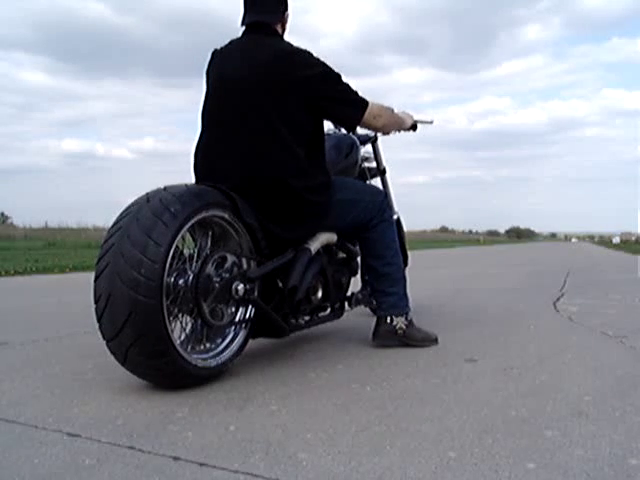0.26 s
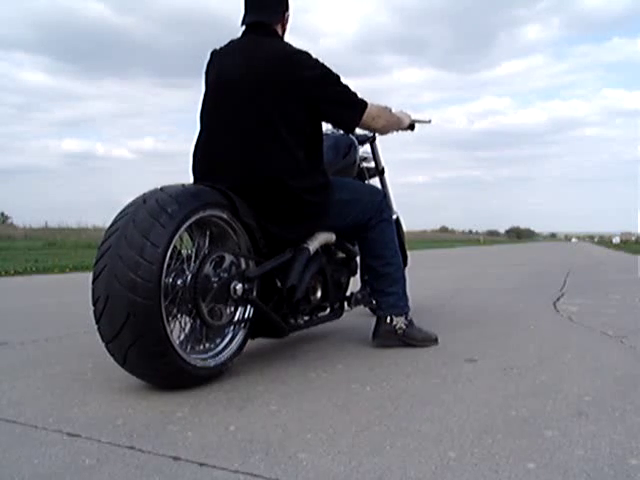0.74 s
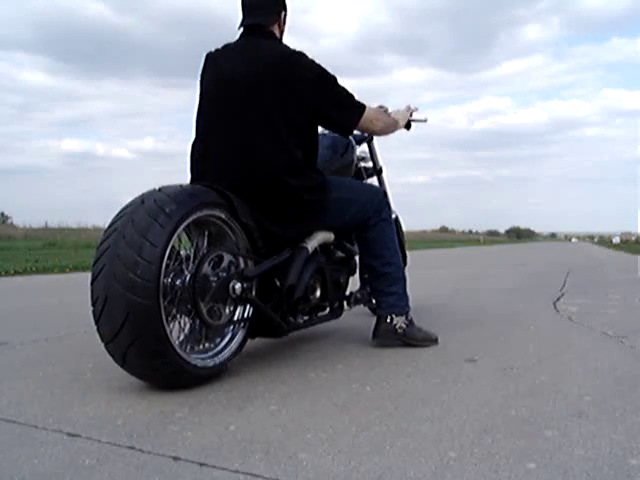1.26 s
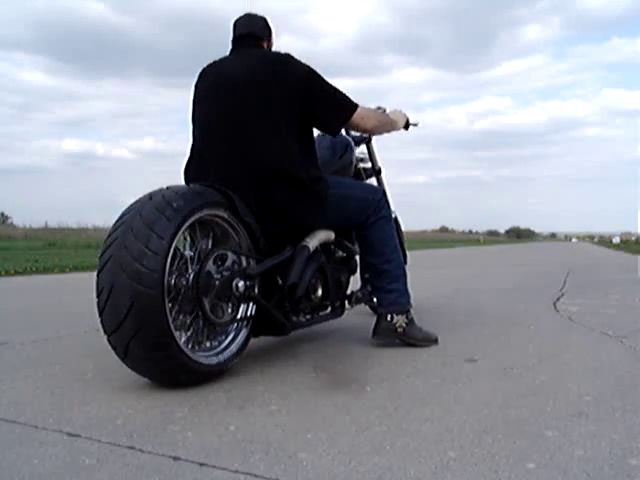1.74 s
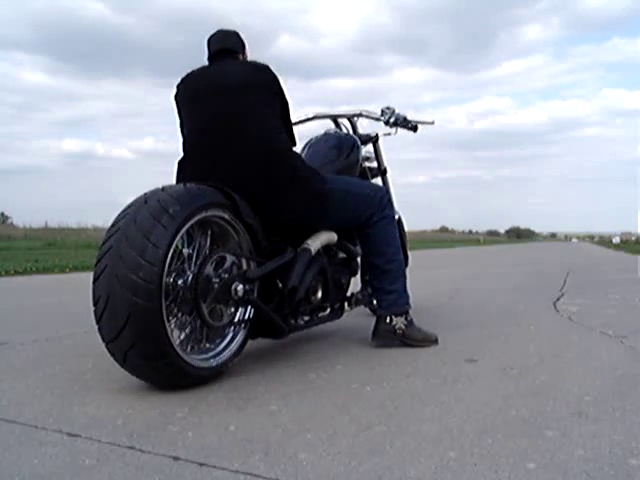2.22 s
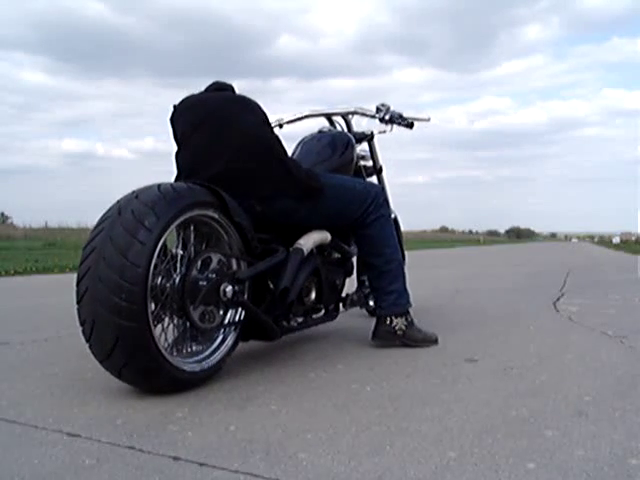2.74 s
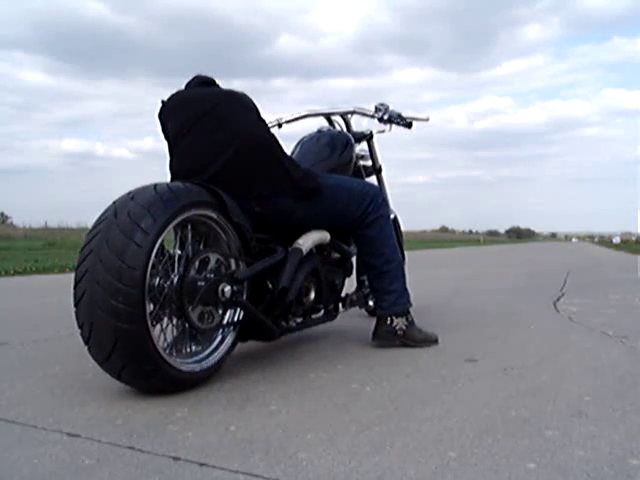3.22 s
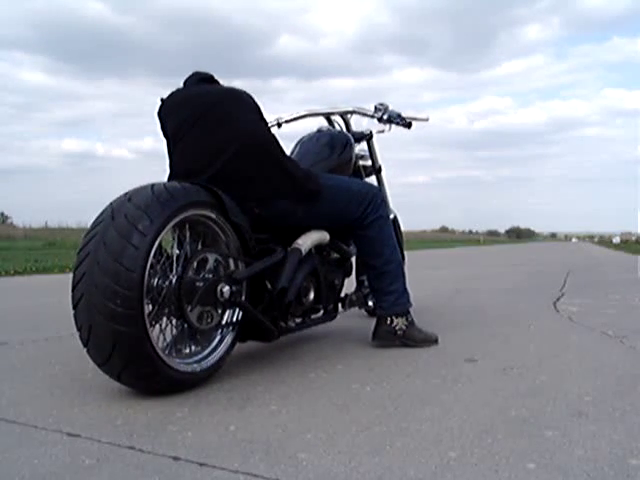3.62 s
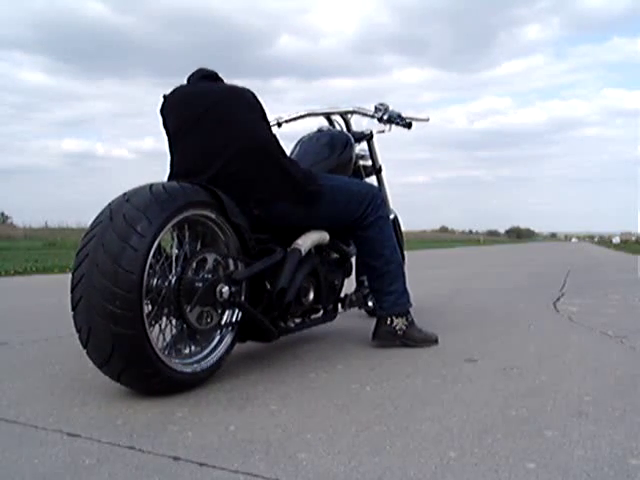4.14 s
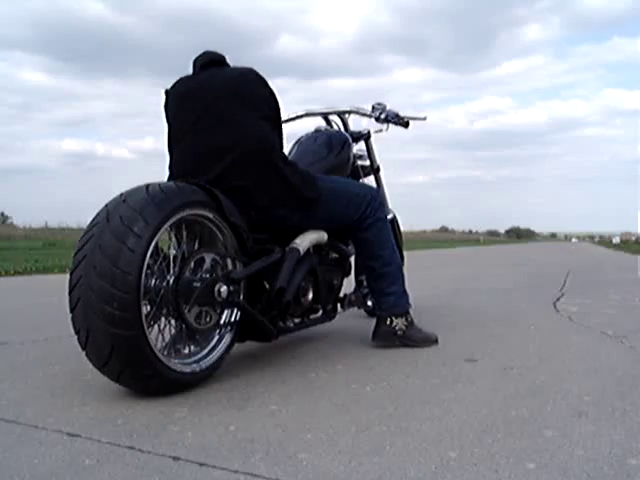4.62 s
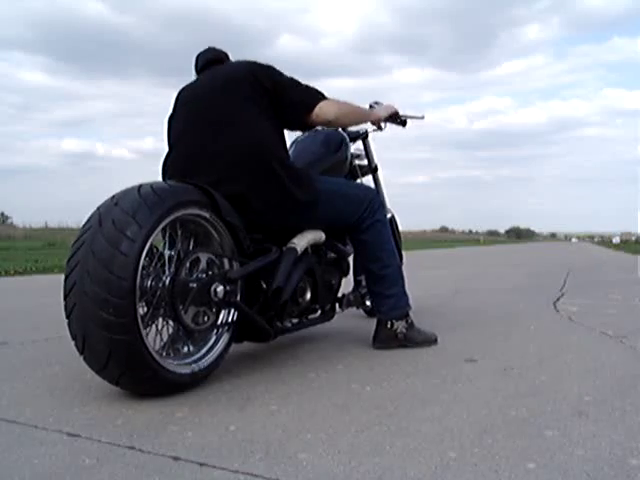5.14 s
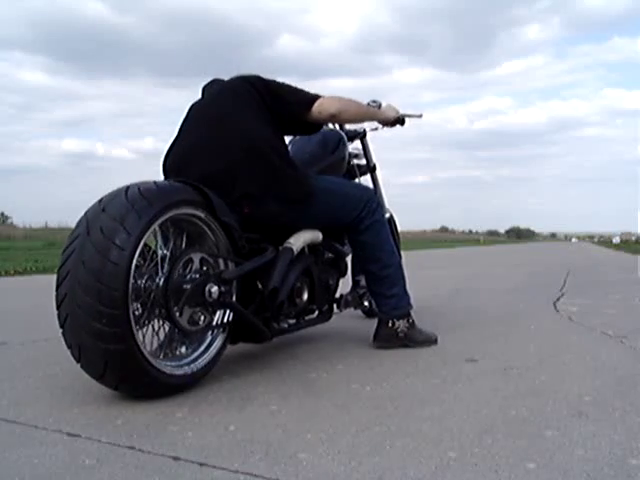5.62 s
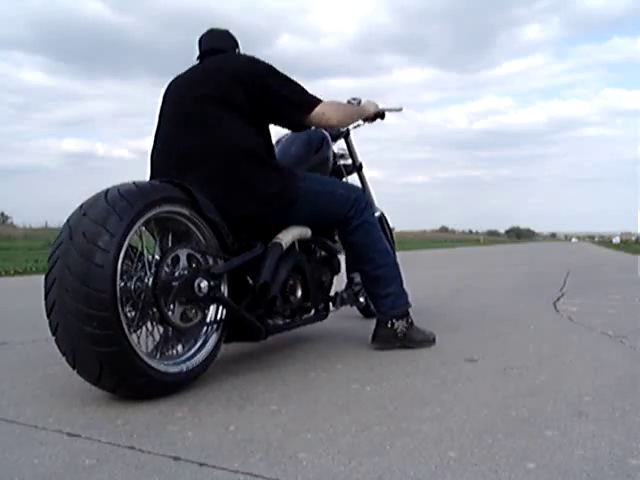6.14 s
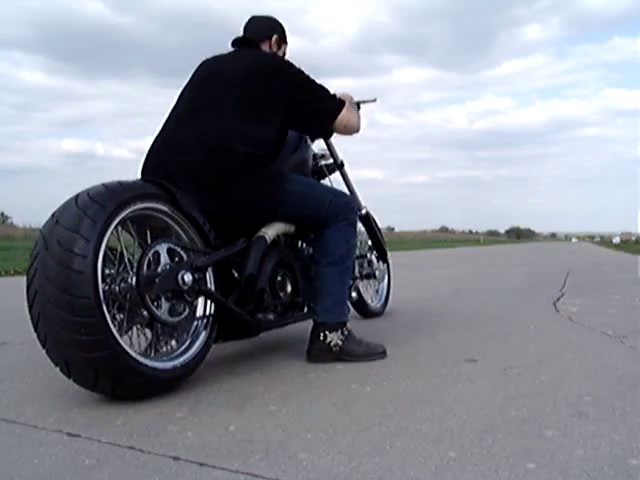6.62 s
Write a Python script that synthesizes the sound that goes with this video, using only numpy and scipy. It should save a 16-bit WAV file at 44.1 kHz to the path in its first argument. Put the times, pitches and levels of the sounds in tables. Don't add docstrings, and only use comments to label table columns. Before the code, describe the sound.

Uneven, choppy motorcycle idle outdoors, close and dry. Rapid bursts of turbulent exhaust gas snap from short open pipes, each with a quick slap off the road and a brief hollow ring rising in pitch. Every few beats an extra pop and low boom from the second cylinder makes it lope. Low mechanical rattle fills the gaps. Small camera sound, light in bass, slightly overloaded, with muffled highs.

```python
import sys
import numpy as np
from scipy import signal
from scipy.fft import rfft, irfft
from scipy.io import wavfile
from scipy.ndimage import uniform_filter1d

SR = 44100
rng = np.random.default_rng(int(sys.argv[2]) if len(sys.argv) > 2 else 0)


def amplitude_ratio(level_db):
    exponent = np.asarray(level_db, float) / 20
    return 10 ** exponent


def put_to_file(sound):
    columns = np.atleast_2d(sound).T
    safe = np.clip(columns, -1, 1)
    whole_steps = np.round(safe * 32767)
    wavfile.write(sys.argv[1], SR, whole_steps.astype(np.int16))


N = 302967

# start_s, crack_db, treble_share_db, third_mode_db
NEAR_CHARGES = [(0.535, -12, -4, -25.5), (0.988, -11, -2, -25.5), (1.654, -10.5, -2.5, -32),
                (1.782, -11, -2.5, -30), (1.92, -11.5, -2.5, -30), (2.324, -10, -5, -27.5),
                (2.57, -8.5, -6.5, -34), (2.694, -13, -4, -29.5), (2.94, -11.5, -1.5, -32.5),
                (3.068, -11.5, 0, -30.5), (3.201, -11, -5.5, -27.5), (3.317, -12.5, -6.5, -24),
                (3.439, -11.5, -5.5, -29.5), (3.68, -13.5, -2, -29), (3.913, -11.5, -2, -27),
                (4.025, -10.5, -2, -29.5), (4.25, -12, -3.5, -29.5), (4.733, -11.5, -0.5, -27),
                (4.844, -10, -6.5, -24.5), (4.962, -10.5, -5, -31), (5.208, -11, -0.5, -29.5),
                (5.445, -12.5, -1.5, -28), (5.704, -11, -6.5, -27.5), (6.201, -13, -2, -30),
                (6.322, -10, -2.5, -35), (6.571, -10.5, -3.5, -31.5), (6.832, -11.5, 0, -31)]
# start_s, crack_db, treble_share_db, third_mode_db
MORE_NEAR_CHARGES = [(0.072, -15, -0.5, -28), (0.186, -23.5, -3, -30.5), (0.306, -13, 1, -27),
                     (0.76, -11.5, -1, -26.5), (1.097, -12.5, -3, -30), (1.212, -11, -3.5, -30),
                     (1.343, -14, -2.5, -32), (1.512, -13, -5, -32.5), (2.053, -11, -1.5, -32.5),
                     (2.183, -13.5, -4, -28.5), (2.443, -13.5, -9, -24), (2.817, -11.5, -4, -29),
                     (3.556, -15.5, -3.5, -27.5), (4.139, -13.5, -0.5, -29), (4.366, -13.5, -5, -27.5),
                     (4.493, -12, -4, -30), (4.61, -19.5, -3, -26), (5.081, -15, -3, -27),
                     (5.324, -12, 0, -27.5), (5.569, -16, -7, -30), (5.962, -13.5, 0.5, -26.5),
                     (6.078, -15, -6.5, -25.5), (6.445, -11, -2.5, -31)]
# crack_db, treble_share_db, first_mode_db, third_mode_db
MISSED_CHARGE = (-38, -9, -39, -38)
# start_s, crack_db, boom_delay_ms, boom_db
LIT_CHARGES = [(0.238, -14, 28.5, -12), (0.811, -46, 23, -15), (1.41, -13, 35, -24), (1.72, -52, 18.4, -17),
               (1.977, -15, 30, -17), (2.375, -10, 24.5, -13.5), (2.869, -26.5, 28, -12.5),
               (3.251, -16, 26, -11.5), (3.728, -26.5, 26, -11), (4.187, -15.5, 24.6, -12),
               (4.781, -14.5, 26, -11.5), (5.258, -10.5, 25, -13.5), (5.626, -44.5, 34, -21),
               (6.013, -16.5, 26, -10.5), (6.383, -47, 24.7, -18), (6.756, -16.5, 28.6, -13)]
# pitch_hz, density_db (dB per Hz)
NEAR_CRACK_COLOUR = [(180, -46), (300, -8.5), (760, -9), (1310, -14.5), (2630, -0.5), (3290, 0.5),
                     (4240, -7.5), (4840, -6.5), (6720, -5), (7460, -2), (9750, -8), (10500, -26),
                     (13600, -67), (22000, -120)]
# pitch_hz, density_db (dB per Hz)
FAR_CRACK_COLOUR = [(180, -41.5), (300, -6), (622, -7), (1300, -11), (2040, -5.5), (2630, -2), (3990, -1),
                    (5070, -4), (6520, -9), (8530, -2), (9890, -4), (10500, -42), (13600, -59),
                    (22000, -120)]
# pitch_hz, width_hz, level_db
MOUTH_MODES = [(1140, 33, -1.5), (2143, 67, -1.5), (2687, 70, -4.5), (3523, 253, -3), (5320, 210, -13.5)]
# pitch_hz, first_fall_db_per_ms, echo_db, echo_fall_db_per_ms
CRACK_FADE = [(500, 0.6, -10, 0.1), (2300, 1.5, -10.5, 0.6), (6040, 2.5, -15, 5.5), (8300, 3.5, -21.5, 3.5)]
# after_crack_ms, first_mode_hz, first_db, third_mode_hz, third_db
NEAR_PIPE_STROKE = [
    (-3, 128, -20, 194, -13.5),
    (3, 158, 8, 196, -5),
    (9.5, 81, -6, 242, 1),
    (22, 84, -3, 278.3, 0.5),
    (29.5, 122, 5.5, 327, -1.5),
    (36, 144, -2, 365.5, -1),
    (38.5, 118, -21.5, 378, -8),
    (67.5, 115, -16, 345, -15),
    (108, 117.5, -41.5, 350, -25),
]
# from_boom_top_ms, pitch_hz, level_db
FAR_PIPE_STROKE = [
    (-32, 91, -22.5),
    (-16, 100, -17.5),
    (-8.5, 140.5, -7.5),
    (1, 185, -0.5),
    (4.5, 225.5, -1.5),
    (9, 178, -13),
    (28.5, 169, -10.5),
    (45.5, 160, -13),
    (67.5, 94, -47),
]
# multiple, level_db
BOOM_OVERTONES = [(2, -12), (3, -15)]
# pitch_hz, density_db (dB per Hz)
CLATTER_COLOUR = [(24, -65), (40, -40.5), (70, -19.5), (110, -7), (214, -13.5), (384, -16), (611, -15.5),
                  (997, -23), (2050, -26), (2650, -29), (3350, -30), (5730, -39), (9350, -44),
                  (10500, -62.5), (13600, -99)]


def evened(x):
    return x / np.sqrt(np.mean(x ** 2) + 1e-20)


def read(points, hz):
    f, *values = np.transpose(points)
    return [np.interp(np.log(hz + 1), np.log(f + 1), v) for v in values]


def add(mix, s, sound):
    at = int(round(s * SR))
    sound = sound[max(-at, 0):]
    part = mix[max(at, 0):][:len(sound)]
    part += sound[:len(part)]


def coloured(x, points):
    gain_db = read(points, np.fft.rfftfreq(len(x), 1 / SR))[0]
    return irfft(rfft(x) * amplitude_ratio(gain_db), len(x))


def wobble(count, size):
    return evened(uniform_filter1d(uniform_filter1d(rng.standard_normal(count), size), size))


def near_strokes(first_boom_db=-29.5, more_boom_db=-29.5, miss_gap_s=0.2):
    rows = [(s, crack, treble, first_boom_db, third) for s, crack, treble, third in NEAR_CHARGES]
    rows += [(s, crack, treble, more_boom_db, third) for s, crack, treble, third in MORE_NEAR_CHARGES]
    rows = sorted(rows)
    missed = [((a[0] + b[0]) / 2, *MISSED_CHARGE) for a, b in zip(rows, rows[1:]) if b[0] - a[0] > miss_gap_s]
    return sorted(rows + missed)


def far_strokes(near, scatter_db=3.0, cycle_ms=120.0):
    lag_share = 0.436
    starts = np.array([row[0] for row in near])
    starts = np.append(starts[0] - cycle_ms / 1e3, starts)
    rows, unlit = [], 1
    chances = scatter_db * rng.standard_normal((len(near), 2))
    for a, b, chance in zip(starts, starts[1:], chances):
        lit = [(s, crack, -0.26, delay, boom) for s, crack, delay, boom in LIT_CHARGES if a < s < b]
        slow_ms = (b - a) * 1e3 - cycle_ms
        crack_db = -36.5 - 3 * unlit + chance[0]
        delay_ms = 28.5 + 1.8 * unlit + 0.26 * slow_ms
        boom_db = -23.2 - 1.65 * unlit - 0.3548 * slow_ms + 0.38 * chance[1]
        rows += lit or [(a + lag_share * (b - a), crack_db, 2, delay_ms, boom_db)]
        unlit = 0 if lit else unlit + 1
    return rows


def cracks(rows, colour, rise_db_ms, scatter_db):
    soft_db = -16
    hz = np.fft.rfftfreq(128, 1 / SR)
    ms = (np.arange(90) - 14) * 32e3 / SR
    fall, echo_db, echo_fall = (v[:, None] for v in read(CRACK_FADE, hz))
    after = np.maximum(ms, 0)
    shape = amplitude_ratio(-fall * after) + amplitude_ratio(echo_db - echo_fall * after)
    shape = shape * amplitude_ratio(rise_db_ms * np.minimum(ms, 0))
    treble = np.clip((hz[:, None] - 3800) / 1400, 0, 1)
    wide = np.fft.rfftfreq(4096, 1 / SR)
    mouth = 1 + sum(amplitude_ratio(db) / (1 + (2 * (wide - f) / w) ** 2) for f, w, db in MOUTH_MODES)
    mouth = mouth * amplitude_ratio(read(colour, wide)[0])
    mouth = mouth / np.sqrt(np.mean(mouth[140:420] ** 2))
    out = np.zeros(N)
    for s, db, treble_db, *_ in rows:
        a, b = rng.standard_normal((2, 90, 65)).transpose(0, 2, 1)
        uneven = amplitude_ratio(scatter_db * wobble(count=65, size=3) * np.clip(hz / 2000, 0.2, 1))[:, None]
        sharpness = np.clip(1.5 + (db - soft_db) / 30, 0.55, 1)
        z = (a + 1j * b) * shape ** sharpness * uneven
        z = z * amplitude_ratio(db + (treble_db + 3.5) * treble)
        burst = signal.istft(z, nperseg=128, noverlap=96)[1]
        burst = irfft(rfft(np.pad(burst, (300, 0)), 4096) * mouth)
        add(out, s - (14 * 32 + 300) / SR, burst)
    return out


def near_pipe(rows, fifth_db=-15, rough_db=3.0, drift=0.024):
    ms, *columns = np.transpose(NEAR_PIPE_STROKE)
    t = np.arange(ms[0], ms[-1], 1e3 / SR)
    first_hz, first, third_hz, third = (np.interp(t, ms, c) for c in columns)
    modes_hz = (first_hz, third_hz, third_hz * 5 / 3)
    out = np.zeros(N)
    for s, _, _, first_db, third_db in rows:
        bend = 1 + drift * wobble(count=len(t), size=400)
        levels = (first + first_db, third + third_db, third + third_db + fifth_db)
        for f, db in zip(modes_hz, levels):
            flutter = rough_db * wobble(count=len(t), size=120)
            turn = 2 * np.pi * np.cumsum(f * bend) / SR
            wave = np.sin(turn + rng.normal(0, 0.76))
            add(out, s + ms[0] / 1e3, np.sqrt(2) * amplitude_ratio(db + flutter) * wave)
    return out


def far_pipe(rows, rough_db=1.0, drift=0.042, ring_share=0.73):
    ms, *columns = np.transpose(FAR_PIPE_STROKE)
    t = np.arange(ms[0], ms[-1], 1e3 / SR)
    hz, level = (np.interp(t, ms, c) for c in columns)
    out = np.zeros(N)
    for s, _, _, delay_ms, db in rows:
        bend = 1 + drift * wobble(count=len(t), size=400)
        turn = 2 * np.pi * np.cumsum(hz * bend) / SR
        turn = turn - np.interp(0, t, turn)
        level_db = db + level - ring_share * (db + 20.0) * np.clip(t / 11, 0, 1)
        level_db = level_db + rough_db * wobble(count=len(t), size=200)
        overtones = sum(amplitude_ratio(o + 0.5 * level) * np.cos(k * turn) for k, o in BOOM_OVERTONES)
        wave = np.cos(turn) + overtones
        add(out, s + (delay_ms + ms[0]) / 1e3, np.sqrt(2) * amplitude_ratio(level_db) * wave)
    return out


def clatter(rows, flicker_db=2.0, stroke_db=2.5, stroke_ms=20, swell_db=1.0):
    strokes = np.zeros(N)
    t = np.arange(3000) * 1e3 / SR
    for s, *_ in rows:
        add(strokes, s, t / stroke_ms * np.exp(1 - t / stroke_ms))
    noise = rng.standard_normal(N)
    flicker = flicker_db * wobble(count=N, size=150)
    swell = swell_db * wobble(count=N, size=1200)
    noise = noise * amplitude_ratio(stroke_db * strokes + flicker + swell)
    return amplitude_ratio(-34.5) * evened(coloured(noise, CLATTER_COLOUR))


def scene():
    near = near_strokes()
    far = far_strokes(near)
    bursts = amplitude_ratio(-7) * cracks(near, NEAR_CRACK_COLOUR, rise_db_ms=6.0, scatter_db=2.76)
    bursts = bursts + amplitude_ratio(-8.0) * cracks(far, FAR_CRACK_COLOUR, rise_db_ms=6.7, scatter_db=3.0)
    return (bursts + near_pipe(near) + far_pipe(far) + clatter(near + far))[None]


def lose_faint_treble(x, blocky_db=3.0):
    block_s, early_s = 0.036, 0.002
    range_db, tilt_db_khz = 26.5, 0.38
    carry_db, lead_db = 21.5, 23.0
    loud_db, slope = -39.5, 1.026
    sparse_sigma, sparse_hz, quiet_db = 1.0, 4780, -57.5
    edge_hz = 10120
    hz, t, z = signal.stft(x, SR, nperseg=256, noverlap=192)
    t = t + early_s
    power = abs(z) ** 2 + 1e-16
    block = (t / block_s).astype(int)
    peak = np.full(block[-1] + 3, -160.0)
    np.maximum.at(peak, block + 1, 10 * np.log10(power[12:52].mean(0)))
    peak = loud_db + slope * (peak - loud_db)
    late_half = t / block_s % 1 > 0.5
    coming = peak[block + 2] - np.where(late_half, lead_db, 99)
    floor = np.maximum(peak[block + 1], np.maximum(peak[block] - carry_db, coming))
    smooth = uniform_filter1d(uniform_filter1d(power, size=7, axis=0), size=5, axis=1)
    level = 10 * np.log10(smooth + 1e-16)
    patches = rng.standard_normal((4 * len(peak), 33))[(4 * t / block_s).astype(int)]
    patches = patches.repeat(4, axis=1)[:, :len(hz)].T
    pitch = hz[:, None]
    under = blocky_db * patches + floor - range_db + tilt_db_khz * pitch / 1e3 - level
    sparse = (patches > sparse_sigma) & (pitch > sparse_hz) & (level < quiet_db)
    under = np.where(sparse, 2, under)
    masked = np.clip(under / 2, 0, 1) * (pitch > 1800)
    lost = np.maximum(masked, np.clip((pitch - edge_hz) / 500, 0, 1))
    return signal.istft(z * amplitude_ratio(-70 * lost), SR, nperseg=256, noverlap=192)[1][:N]


def roll_off(x):
    return signal.sosfilt(signal.butter(12, 10840, fs=SR, output="sos"), x)


def record(dry):
    bass_cut = signal.butter(4, 66, "high", fs=SR, output="sos")
    x = signal.sosfilt(bass_cut, dry[0])
    x = lose_faint_treble(np.clip(x, -0.82, 0.82))
    return roll_off(np.clip(x, -1, 1)[None])


dry = scene()
out = record(dry)
put_to_file(out)
```